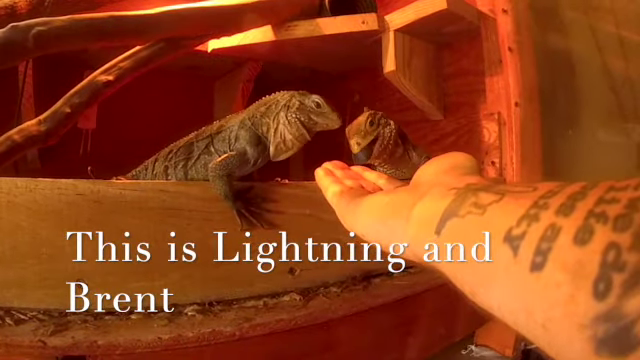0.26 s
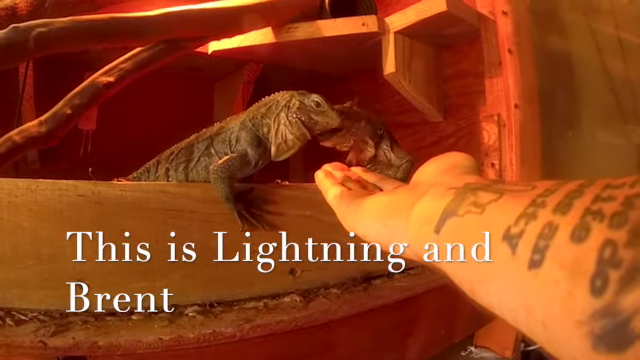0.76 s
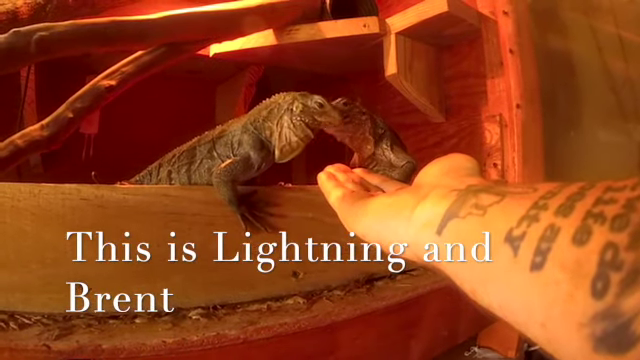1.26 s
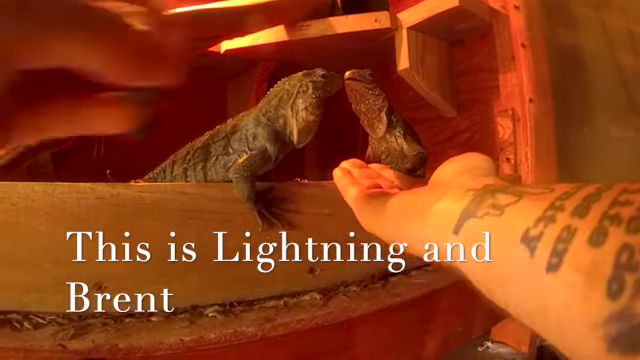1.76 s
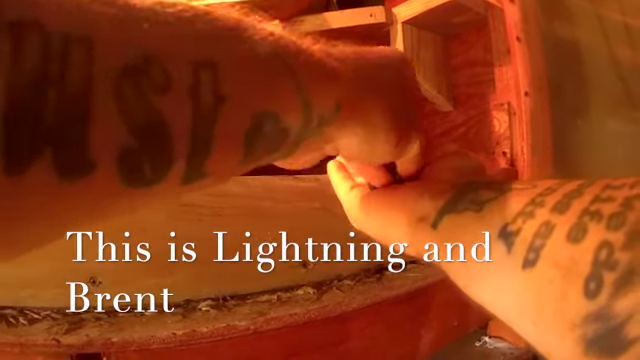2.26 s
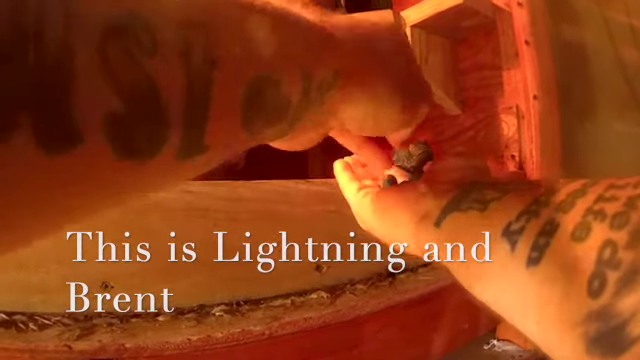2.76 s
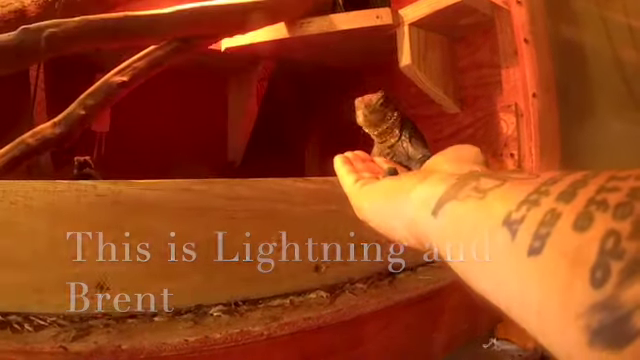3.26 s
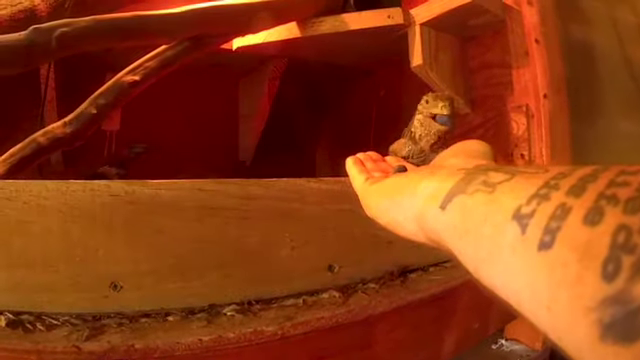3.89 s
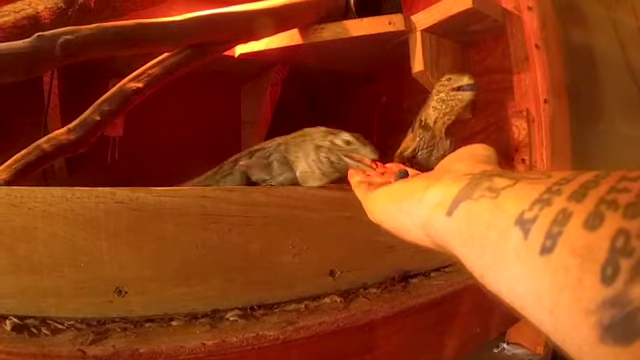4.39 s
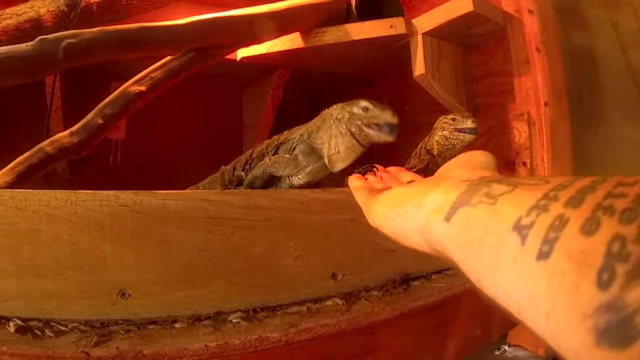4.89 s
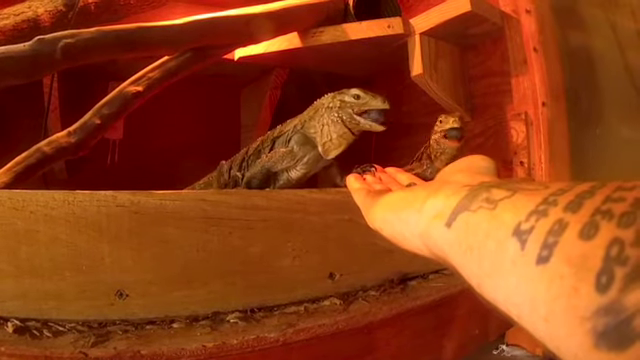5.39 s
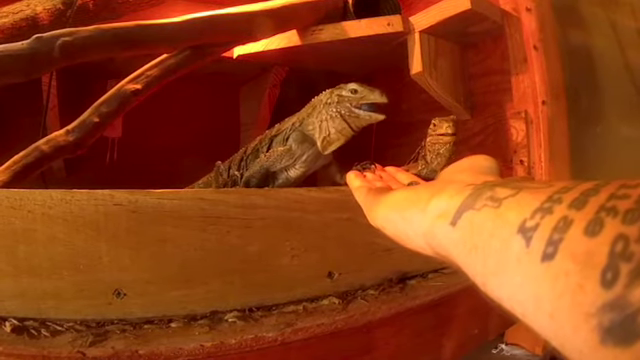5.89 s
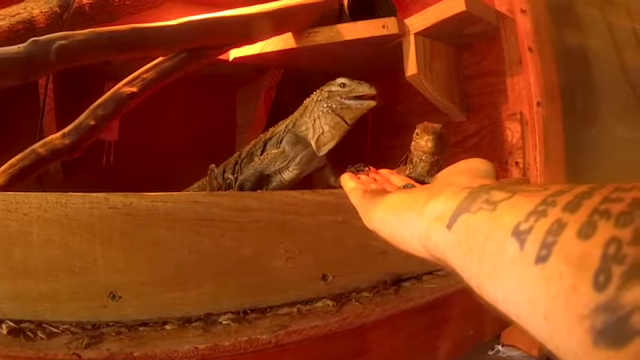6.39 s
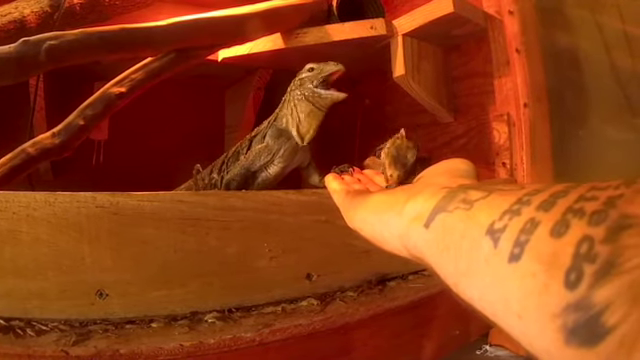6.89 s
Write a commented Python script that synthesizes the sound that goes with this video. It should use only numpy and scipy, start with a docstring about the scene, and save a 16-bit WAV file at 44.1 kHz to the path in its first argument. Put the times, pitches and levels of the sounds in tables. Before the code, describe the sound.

Close, boxy plywood enclosure with soft low room noise. Quiet scuffing and light woody taps open, then near silence. Around two seconds a lizard bolts: claws scrabble, boards knock and the floor booms. After a lull it rushes back with much louder hollow blows and a very sharp crunching snap, followed by a second crunchy clatter. Sparse soft knocks and a faint rising hum end it.

```python
"""Claws, bodies and jaws knock on hollow boards: two iguanas are hand-fed hard pellets in a plywood enclosure.
One bolts, later rushes back and snaps up a pellet. Blows are damped modes plus noise bursts, with box and walls
answering; landing weight booms. Movements are strokes of filtered random grains, with light taps.
Short tones groan from the woodwork. Underneath: steady room noise, rumble and a passing low hum of rising pitch."""
import sys
import numpy as np
from scipy import signal
from scipy.fft import rfft, irfft, next_fast_len
from scipy.io import wavfile
from scipy.ndimage import map_coordinates

SR = 44100
rng = np.random.default_rng(int(sys.argv[2]) if len(sys.argv) > 2 else 0)


def digitize_waveform(pressure):
    """Quantize a signal to 16-bit integers and store it at the path in sys.argv[1].

    Rows of a 2-D input are taken as channels; values are limited to [-1, 1].
    """
    field = np.atleast_2d(pressure).T
    bounded = np.clip(field, -1, 1)
    quanta = np.round(bounded * 32767).astype(np.int16)
    wavfile.write(sys.argv[1], SR, quanta)


N = 315215

# Background noise spectra. Each row: frequency in Hz, relative density in dB.
AIR_SPECTRUM = [(25, -15), (45, -11), (70, -5), (110, -8.5), (200, -12.5), (310, -12), (410, -18),
                (560, -13), (860, -22.5), (1600, -31.5), (4600, -36.5), (7500, -42), (15500, -45)]
RUMBLE_SPECTRUM = [(3, 0), (15, 0), (25, -4), (45, -18), (100, -50)]
# Woodwork tones as it is pushed. Each row: peak time in s, level in dB (before a 2 dB cut), pitch in Hz,
# time from peak to 1/e in s.
GROANS = [(1.523, -38, 807, 0.0093), (1.976, -20, 816, 0.012), (4.113, -32, 778, 0.027),
          (4.165, -35, 765, .02)]
# Movements over wood and pellets. Each row: start in s, length in s, effort in dB, crispness in dB.
STROKES = [(0, 0.37, -47.5, 2.5), (0.462, 0.1, -47.5, -6), (1.2, 0.49, -65, -1), (1.899, 0.22, -30.5, -0.5),
           (2.2, 0.058, -35, -14), (2.307, 0.22, -46.5, -7), (3.099, 0.053, -50.5, 6),
           (3.199, 0.3, -51, -10.5), (3.555, 0.042, -44.5, -4), (3.969, 0.065, -35, -1),
           (4.062, 0.15, -39, -3), (4.204, 0.054, -31.5, -8), (4.375, 0.081, -35.5, 1),
           (4.523, 0.074, -40.5, -6), (4.677, 0.02, -33, -2), (4.82, 0.078, -46.5, 3),
           (4.947, 0.11, -48, -23), (5.276, 0.055, -41.5, -13), (5.414, 0.071, -48.5, -0.5),
           (6.6, 0.34, -45, -2), (7.041, 0.12, -48, 2)]
# Scales rubbing, pellet crumbs crackling. Each row: frequency in Hz, relative density in dB.
RUB_SPECTRUM = [(150, -2), (380, 8), (570, 13), (780, 4.5), (1000, -10.5), (1500, -7.5), (2900, -46)]
CRUMB_SPECTRUM = [(600, -27), (1100, 11.5), (1450, -6), (1750, 5), (2000, 0.5), (2250, 8), (2550, -32),
                  (3000, -42), (4000, -46)]
# Body weight landing on the floor panel. Each row: time in s, level in dB.
THUMPS = [(1.907, -30), (1.937, -30), (1.969, -31), (2.061, -16.5), (2.072, -15.5), (2.134, -26),
          (2.224, -18), (2.284, -24.5), (3.985, -31), (4.086, -19.5), (4.166, -24.5), (4.215, -18),
          (4.387, -40), (4.66, -29)]
# Floor panel modes. Each row: frequency in Hz, relative level in dB, t60 in s.
PANEL_MODES = [(67, 0, .2), (83, -3, .11), (116, -3, .11)]
# Air and wall modes of the enclosure. Each row: frequency in Hz, relative level in dB.
BOX_MODES = [(205, -4), (243, -4), (275, -8), (335, -5), (445, 0), (575, -4), (606, -8), (667, -5),
             (770, -10), (840, -4), (940, -6), (1044, -5), (1163, -8), (1401, -14), (1549, -13)]
# Decay of the walls' diffuse answer. Each row: frequency in Hz, t60 in s.
WALL_T60 = [(150, 0.47), (600, 0.11), (2000, 0.12), (5000, 0.053), (12000, 0.046)]
# Parts of a blow: board grain, cavity, crack, claw tick. Each row: frequency in Hz, relative density in dB.
WOOD_SPECTRUM = [(250, -53), (420, 6.5), (600, 8.5), (760, 1.5), (950, -2.5), (1250, -14), (1700, -92),
                 (3000, -73)]
HOLLOW_SPECTRUM = [(50, -42), (115, 19.5), (170, 8.5), (220, 20.5), (310, 10.5), (380, 3.5), (600, -43.5)]
CRACK_SPECTRUM = [(600, -22), (1100, 13.5), (1500, 7.5), (1800, 6), (2200, 5), (2600, -6), (3100, -25.5),
                  (6000, -26), (12000, -34)]
CLAW_SPECTRUM = [(2000, -9), (3100, -14), (3900, -4.5), (4550, 1.5), (5200, -12.5), (5900, -11),
                 (7000, -23), (8500, -18), (10000, -30), (13000, -54)]
# Blows of claws, jaws and pellets. Each row: time in s, level in dB, board ring in Hz, hardness in dB,
# follow-through in dB against the level.
KNOCKS = [(0.008, -41.5, 547, -15, -9), (0.053, -50, 565, 2, -12), (0.074, -45.5, 610, -12, 0),
          (0.126, -40.5, 577, -17, 5), (0.145, -36.5, 570, -4, 1), (0.221, -35, 590, -15, -10),
          (0.258, -40.5, 550, -26, -6), (0.314, -35.5, 600, -2, -0.5), (0.599, -54, 654, 0, -14),
          (1.34, -43, 577, -9, -22), (1.846, -35.5, 770, -12, -20), (1.887, -30.5, 620, -9, -20),
          (1.908, -31.5, 537, -7, 0), (1.939, -24, 572, -24, -0.5), (1.964, -25, 633, -4.5, 6.5),
          (1.976, -31, 677, 1.5, -4), (2.008, -42, 560, 7, -14), (2.058, -28, 800, -6.5, -2),
          (2.073, -23, 646, -12, -23), (2.102, -28, 580, -14, -6), (2.149, -36, 773, -9, -2),
          (2.183, -21.5, 577, -24, -25), (2.214, -22, 640, -11, -6), (3.079, -46, 560, -9, -18),
          (3.135, -45, 654, -9, -10), (3.606, -43, 544, -14, -19), (3.802, -40.5, 546, -3, -11),
          (3.909, -37, 556, -2.5, -11), (3.983, -33.5, 697, -12, 3.5), (4.078, -50, 730, 3, -13),
          (4.087, -34.5, 705, -11, -14), (4.165, -26, 687, -17, -4.5), (4.212, -15.5, 586, -22, -4),
          (4.237, -20.5, 562, -18, -22), (4.248, -13, 657, -3, 3.5), (4.382, -15.5, 526, -27, 0.5),
          (4.392, -46.5, 553, 8.5, -13), (4.404, -16.5, 594, -25, 1), (4.442, -20, 640, -13, 2),
          (4.644, -26.5, 550, -36, -7), (4.6585, -5.5, 615, -8, -11.5), (4.6672, -12, 718, -9, -11),
          (4.691, -24, 553, -23, -23), (4.794, -30.5, 565, -22, -8), (4.8205, -14.5, 664, -10, 4.5),
          (4.8675, -16, 632, -11.5, -9.5), (4.878, -15.5, 654, -19, -11.5), (5.015, -39, 520, -14, -10),
          (5.366, -34.5, 582, -7, -17), (5.68, -38, 495, -17, -19), (6.654, -26.5, 607, -34, -21),
          (6.787, -38.5, 638, -26, -0.5)]

AIR_DB, RUMBLE_DB = -48, -45.5
HUM_START_S, HUM_LENGTH_S, HUM_FADE_S = 5.68, 0.91, 0.12
HUM_START_HZ, HUM_RISE_HZ_PER_S = 172, 16.4
HUM_START_DB, HUM_SWELL_DB_PER_S, HUM_WAVER_DB = -55.5, 11.5, 2

ATTACK_S, RELEASE_S = 0.016, 0.041
GENTLE_DB = -43.5  # reference effort of a stroke
RUB_DB, CRUMB_DB, SCRATCH_DB = -48, -55.5, -64  # at the reference effort
CRUMB_GROWTH_DB_PER_DB, SCRATCH_GROWTH_DB_PER_DB = 0.56, 0.81  # against added effort
SCRATCH_CRISP = 0.4  # share of the crispness that goes to the claws
RUB_SPREAD_DB, CRUMB_SPREAD_DB, SCRATCH_SPREAD_DB = 2, 6, 3
CATCH_DB = 3.5  # rms swing of the grip

TAPS_PER_S, TAP_DB, TAP_HARDNESS_DB = 9.2, -42.5, -9  # during a gentle stroke
TAP_GROWTH_DB_PER_DB, TAP_SPREAD_DB = 1, 7.5

BOARD_DB, GRAIN_DB, HOLLOW_DB = 5.5, -3, -9.5  # parts of a blow, against its level
BOARD_T60_S = 0.028
TICK_DB, TICK_LOSS_DB_PER_DB, LIGHT_DB = -17.5, 0.69, -25.5  # tick of a light blow; its lag per dB of force
LUMPS_PER_S, LUMP_DB = 420, 3  # a crack is a run of tiny fractures
WALLS_DB, BOX_DB = -14.5, -21.5
THUMP_HOLLOW_DB = -5
FOLLOW_SWINGS, FOLLOW_DULLER_DB = 3, 8  # delay in board cycles; loss of hardness

CEILING, TOP_HZ = 0.54, 15850


def amp(db):
    """Decibels to gain."""
    return 10 ** (np.asarray(db) / 20)


def unit(x):
    """Scale to rms 1."""
    return x / np.sqrt(np.mean(x ** 2) + 1e-20)


def along(points, hz):
    """Read (Hz, value) points on a log axis."""
    f, v = np.transpose(points)
    return np.interp(np.log(hz + 1), np.log(f), v)


def colour(x, spectrum):
    """Filter x by a spectrum, at rms 1."""
    m = next_fast_len(len(x))
    gain = amp(along(spectrum, np.fft.rfftfreq(m, 1 / SR)))
    return unit(irfft(rfft(x, m) * gain, m)[:len(x)])


def add(track, start_s, sound):
    """Mix a sound into the track."""
    part = track[max(round(start_s * SR), 0):][:len(sound)]
    part += sound[:len(part)]


def clock():
    """Half a second of time, the life of one blow."""
    return np.arange(SR // 2) / SR


def wobble(rate, size):
    """A random curve through rate knots a second."""
    at = np.arange(size) * rate / SR
    return map_coordinates(rng.standard_normal(4096), [at], order=1, mode="wrap")


def gate(start, length, attack, release):
    """An envelope that rises, holds and dies away."""
    t = np.arange(N) / SR - start
    return np.clip(t / attack, 0, 1) * np.exp(-np.clip((t - length) / release, 0, 20))


def onset(rise):
    """A contact builds its force over a fraction of a millisecond or more."""
    return 1 - np.exp(-(clock() / rise) ** 2)


def burst(spectrum, t60, rise, rough_db=0):
    """A dense cluster of resonances, struck in uneven lumps and dying away, with a set energy."""
    fade = onset(rise) * amp(-60 * clock() / t60)
    lumps = amp(rough_db * wobble(LUMPS_PER_S, size=len(fade)))
    strike = rng.standard_normal(len(fade)) * lumps
    return unit(colour(strike, spectrum) * fade) * np.sqrt(np.mean(fade ** 2))


def ring(modes, scatter_db):
    """Damped modes, each at a new strength for every blow."""
    t = clock()
    total = np.zeros(len(t))
    for hz, db, t60 in modes:
        decay = amp(db + scatter_db * rng.normal() - 60 * t / t60)
        total += decay * np.sin(2 * np.pi * hz * t)
    return total


def grains(rate, spread_db):
    """Tiny slips and fractures at random moments and sizes."""
    hits = rng.random(N) < rate / SR
    return hits * rng.choice([-1, 1], N) * amp(spread_db * rng.uniform(-1.4, 1, N))


def background():
    """Steady room noise over a deep rumble, and a faint, wavering hum that creeps upward and swells."""
    t = np.clip(np.arange(N) / SR - HUM_START_S, 0, HUM_LENGTH_S)
    fade = np.clip(np.minimum(t, HUM_LENGTH_S - t) / HUM_FADE_S, 0, 1)
    hum_hz = HUM_START_HZ + HUM_RISE_HZ_PER_S * t
    tone = np.sqrt(2) * np.sin(2 * np.pi * np.cumsum(hum_hz) / SR)
    hum_db = HUM_START_DB + HUM_SWELL_DB_PER_S * t + HUM_WAVER_DB * wobble(12, size=N)
    air = amp(AIR_DB) * colour(rng.standard_normal(N), AIR_SPECTRUM)
    rumble = amp(RUMBLE_DB) * colour(rng.standard_normal(N), RUMBLE_SPECTRUM)
    return air + rumble + fade * amp(hum_db) * tone


def groans():
    """Pushed woodwork gives wavering tones that swell and die within a few hundredths of a second."""
    t = np.arange(N) / SR
    track = np.zeros(N)
    for peak_s, db, hz, half_s in GROANS:
        waver_rad = 0.35 * colour(rng.standard_normal(N), [(30, 0), (150, -80)])
        swell = np.exp(-((t - peak_s) / half_s) ** 2)
        track += amp(db - 2) * swell * np.sin(2 * np.pi * hz * t + waver_rad)
    return track


def scrabble():
    """Scales rub on the wood, crumbs crackle and claws scratch; all grow with effort and catch and slip together."""
    rub, crumbs, scratch = np.zeros((3, N))
    for start, length, effort_db, crisp_db in STROKES:
        shape = gate(start, length, ATTACK_S, RELEASE_S)
        push_db = effort_db - GENTLE_DB
        crumb_db = CRUMB_DB + CRUMB_GROWTH_DB_PER_DB * push_db + crisp_db
        scratch_db = SCRATCH_DB + SCRATCH_GROWTH_DB_PER_DB * push_db + SCRATCH_CRISP * crisp_db
        rub += shape * amp(RUB_DB + push_db)
        crumbs += shape * amp(crumb_db)
        scratch += shape * amp(scratch_db)
    # the grip tightens and lets go some tens of times a second
    grip = colour(rng.standard_normal(N), [(8, -10), (20, 0), (60, -3), (200, -60), (500, -120)])
    catch = unit(amp(CATCH_DB * grip))
    rubbing = rub * colour(grains(rate=1500, spread_db=RUB_SPREAD_DB), RUB_SPECTRUM)
    crackling = crumbs * colour(grains(rate=1300, spread_db=CRUMB_SPREAD_DB), CRUMB_SPECTRUM)
    scratching = scratch * colour(grains(rate=2100, spread_db=SCRATCH_SPREAD_DB), CLAW_SPECTRUM)
    return catch * (rubbing + crackling + scratching)


def enclosure(x, wet_db, box_db):
    """A blow, the diffuse answer of the walls and the ring of the box."""
    t = clock()
    hz, frames, z = signal.stft(rng.standard_normal(len(t)), SR, nperseg=256)
    decay = amp(-60 * frames / along(WALL_T60, hz)[:, None])
    tail = signal.istft(z * decay, SR)[1][:len(t)] * onset(0.005)
    box = np.zeros(len(t))
    for mode_hz, db in BOX_MODES:
        # where the blow lands sets the sign of each mode: drawn at random
        box += rng.choice([-1, 1]) * ring([(mode_hz, db, 0.28)], scatter_db=2)
    answer = amp(wet_db) * tail / np.linalg.norm(tail) + amp(box_db) * box / np.linalg.norm(box)
    return x + signal.fftconvolve(x, answer)[:len(t)]


def blow(db, hz, hardness_db):
    """One contact rings the board and the cavity behind it; the harder it is, the more it cracks and ticks."""
    board = amp(BOARD_DB) * onset(0.00052) * ring([(hz, 0, BOARD_T60_S)], scatter_db=2)
    grain = amp(GRAIN_DB) * burst(WOOD_SPECTRUM, t60=0.069, rise=0.0038)
    hollow = amp(HOLLOW_DB) * burst(HOLLOW_SPECTRUM, t60=0.055, rise=0.0023)
    crack = amp(hardness_db) * burst(CRACK_SPECTRUM, t60=0.037, rise=0.00074, rough_db=LUMP_DB)
    tick_db = hardness_db + TICK_DB - TICK_LOSS_DB_PER_DB * (db - LIGHT_DB)
    tick = amp(tick_db) * burst(CLAW_SPECTRUM, t60=0.057, rise=0.00024, rough_db=LUMP_DB)
    contact = amp(db) * (board + grain + hollow + crack + tick)
    return enclosure(contact, wet_db=WALLS_DB, box_db=BOX_DB)


def taps():
    """Claws and loose pellets tap lightly at random moments of the longer strokes."""
    track = np.zeros(N)
    for start, length, effort_db, crisp_db in STROKES:
        top_db = TAP_DB + TAP_GROWTH_DB_PER_DB * (effort_db - GENTLE_DB)
        for when, size, pitch in rng.random((int(length * TAPS_PER_S), 3)):
            tap_db = top_db - TAP_SPREAD_DB * size
            tap = blow(tap_db, 540 + 160 * pitch, TAP_HARDNESS_DB + crisp_db)
            add(track, start + when * length, tap)
    return track


def thumps():
    """The floor panel and the cavity under it boom under a lizard's weight."""
    track = np.zeros(N)
    for start_s, db in THUMPS:
        panel = ring(PANEL_MODES, scatter_db=2) * onset(0.0063)
        cavity = amp(THUMP_HOLLOW_DB) * burst(HOLLOW_SPECTRUM, t60=0.1, rise=0.0058)
        add(track, start_s, amp(db) * (panel + cavity))
    return track


def knocks():
    """A sharp first contact; the board swings back against the mass behind it for a second, duller one."""
    track = np.zeros(N)
    for start_s, db, hz, hardness_db, follow_db in KNOCKS:
        add(track, start_s, blow(db, hz, hardness_db))
        follow = blow(db + follow_db, hz, hardness_db - FOLLOW_DULLER_DB)
        add(track, start_s + FOLLOW_SWINGS / hz, follow)
    return track


def scene():
    """Everything at one microphone."""
    movement = groans() + scrabble() + taps()
    return (background() + movement + thumps() + knocks())[None]


def record(dry):
    """The microphone flattens the loudest peaks; nothing passes above the band limit."""
    clipped = dry / (1 + np.abs(dry / CEILING) ** 14) ** (1 / 14)
    m = next_fast_len(N + SR // 2)
    passband = np.fft.rfftfreq(m, 1 / SR) < TOP_HZ
    return irfft(rfft(clipped, m) * passband, m)[..., :N]


dry = scene()
out = record(dry)
digitize_waveform(out)
```